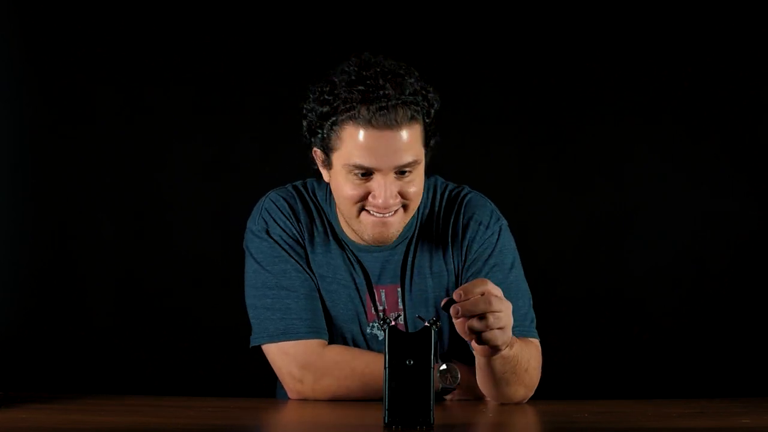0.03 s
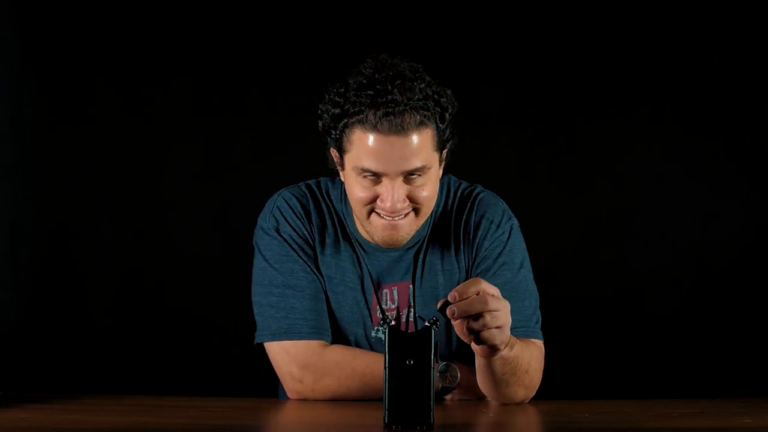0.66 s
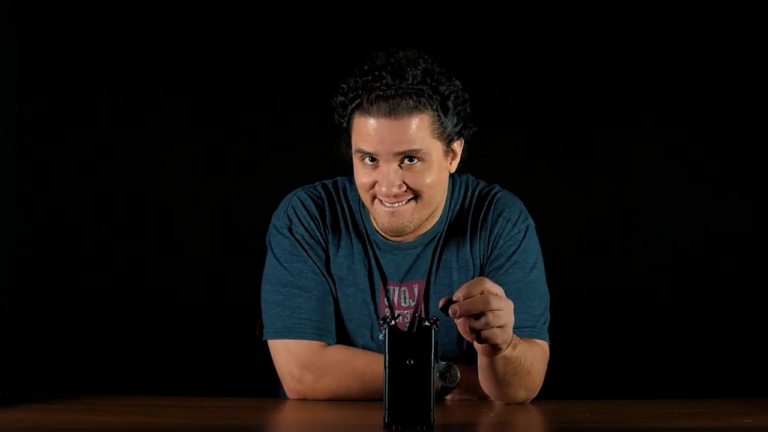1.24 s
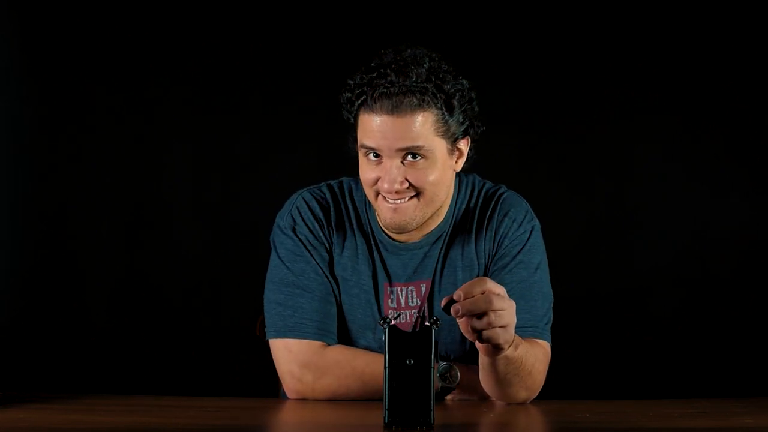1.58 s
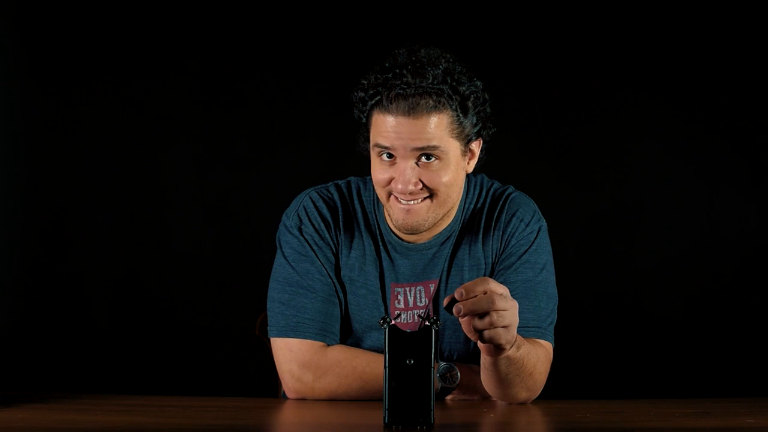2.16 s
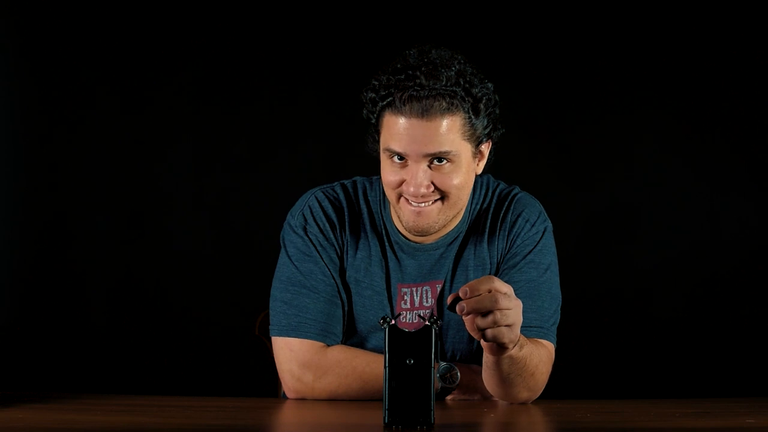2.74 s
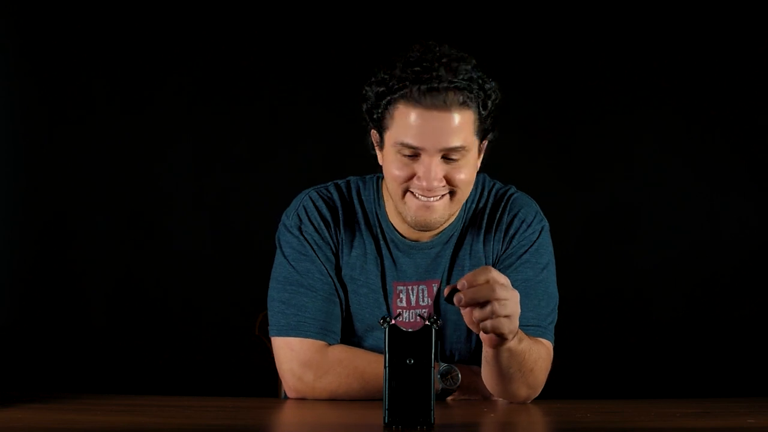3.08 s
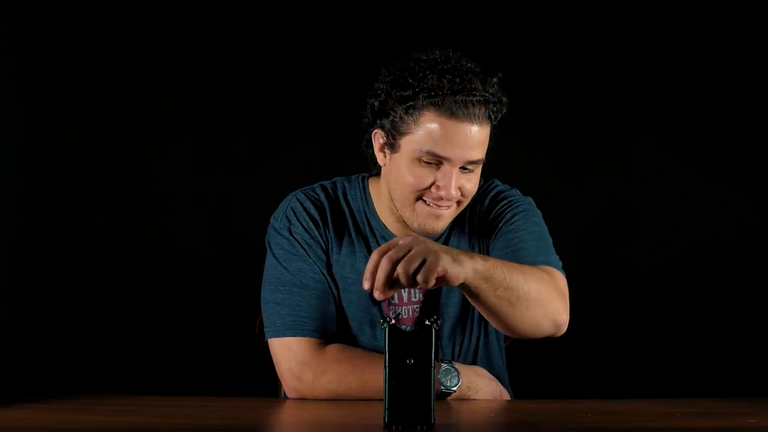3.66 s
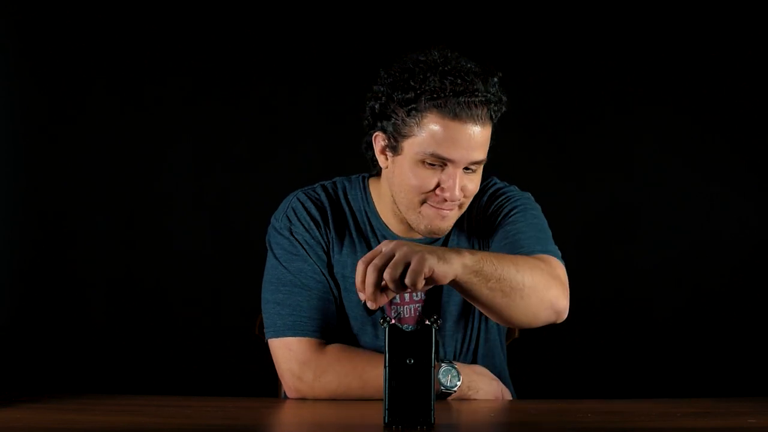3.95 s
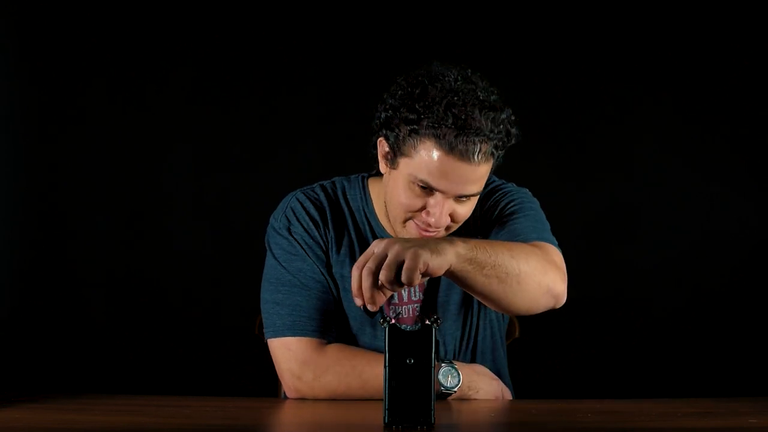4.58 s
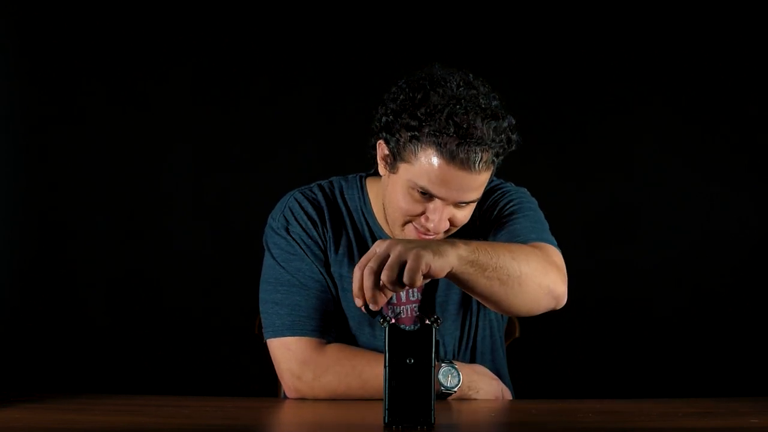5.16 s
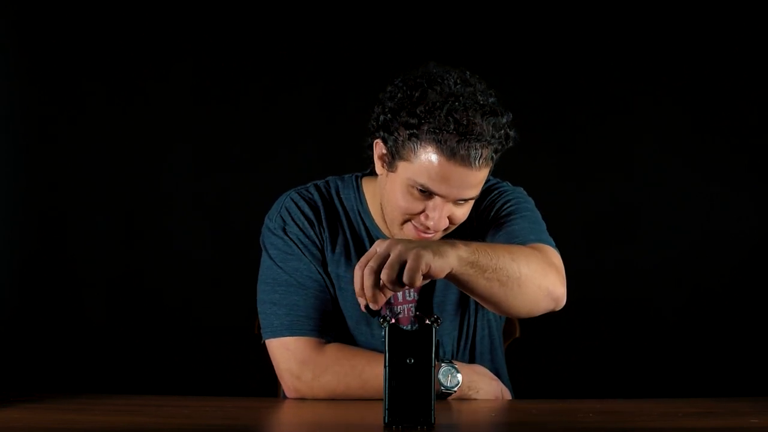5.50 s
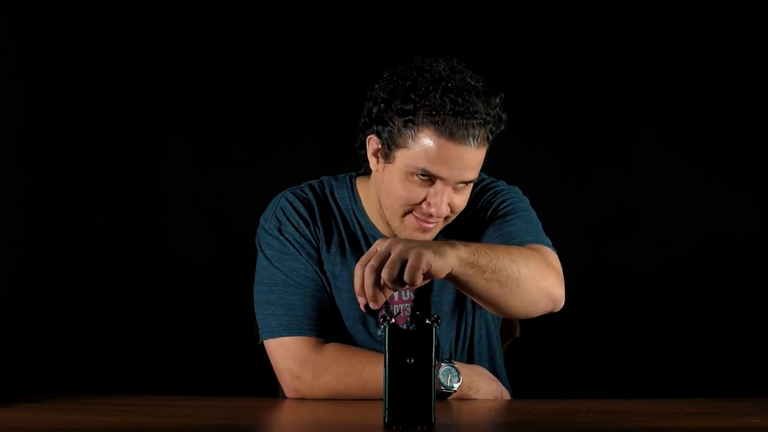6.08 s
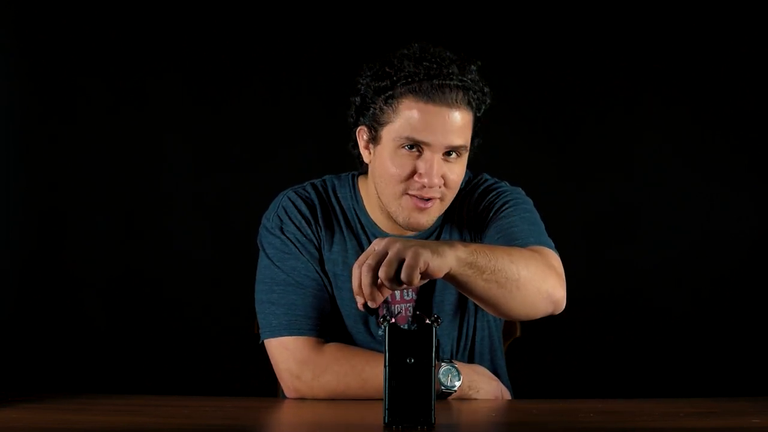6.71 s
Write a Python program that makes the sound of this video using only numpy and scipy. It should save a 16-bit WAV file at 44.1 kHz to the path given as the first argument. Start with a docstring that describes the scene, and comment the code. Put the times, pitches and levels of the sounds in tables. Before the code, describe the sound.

Very close finger scratching on microphone grilles, a low rumble with a hissy rasp, heard almost wholly on one side at a time. It starts on the right with fast light rubs, thins out around a dull bump on the recorder's body, and resumes louder on the left as a back-and-forth stroke with soft fingertip thuds. Faint wet smacks dot the otherwise quiet room.

```python
"""A quiet room: fingertips scratch the mesh over two microphone capsules, first the right in mostly
even rubs, then the left in long pulls and short flicks back. A finger lands with a soft thump, creeps,
then slides; the faster the slide, the higher the rumble and the more the mesh rasps and hisses, almost
wholly on that side. The hand bumps the housing once as it changes sides. A few small wet ticks and
smacks reach both capsules through the air."""
import sys
import numpy as np
from scipy import signal
from scipy.fft import rfft, irfft
from scipy.io import wavfile
from scipy.ndimage import uniform_filter1d

SR = 44100
rng = np.random.default_rng(int(sys.argv[2]) if len(sys.argv) > 2 else 0)


def wav_record(signal):
    """Record a signal, one row per channel, as 16-bit PCM in the file named by sys.argv[1]."""
    frames = np.transpose(np.atleast_2d(signal))
    bounded = np.clip(frames, -1, 1)
    # unit amplitude maps onto the largest positive 16-bit level
    quanta = np.round(bounded * 32767).astype(np.int16)
    wavfile.write(sys.argv[1], SR, quanta)


N = 301511

# room rumble and preamplifier hiss: f/Hz, left density/dB, right density/dB
FLOOR_SPECTRUM = [(24, -92, -104), (69, -77, -86.5), (139, -83, -78.5), (263, -88, -94.5),
                  (384, -107, -106), (560, -102, -103), (1190, -113, -114), (2200, -119, -118),
                  (3470, -123, -123), (11650, -127, -126), (13700, -139, -139)]
# finger tremor: f/Hz, relative density/dB
TREMOR_SPECTRUM = [(25, -14), (65, 13), (110, 8.5), (170, 11), (300, -14.5), (600, -9), (1200, -22.5),
                   (2500, -50)]
# tremor on each capsule: t/s, relative level/dB
RIGHT_TREMOR = [(0.0, -65.5), (0.27, -71), (0.44, -49.5), (0.89, -70), (1.2, -49), (2.02, -53.5),
                (3.4, -66)]
LEFT_TREMOR = [(3.87, -64), (4.3, -54.5), (4.75, -53), (5.1, -43.5), (5.7, -49.5), (6.3, -47.5),
               (6.84, -48.5)]
# friction on each capsule: f/Hz, relative density/dB
RIGHT_SPECTRUM = [(15, -74), (25, -54), (48, -24.5), (188, 4), (420, 1), (629, -13.5), (1020, -7),
                  (1890, -29.5), (2480, -35), (3350, -41.5), (4300, -36.5), (5200, -44.5), (6200, -41),
                  (7660, -41.5), (8760, -45), (10000, -39), (15400, -62)]
LEFT_SPECTRUM = [(15, -61), (25, -55), (60, -27.5), (129, -7), (246, 1.5), (296, -1), (409, -3),
                 (596, -22.5), (1110, -27), (1840, -49), (2750, -50.5), (3500, -51.5), (4700, -52.5),
                 (6200, -53.5), (8300, -54), (10600, -52.5), (13500, -62.5), (15400, -77)]
# capsule and grille resonances: f/Hz, width/Hz, gain/dB
CAPSULE_MODES = [(240, 28, -0.5), (403, 360, -0.5), (977, 1800, 4.5), (2450, 780, 9), (4180, 690, -2.5),
                 (7880, 2700, 6.5), (10600, 3500, 4), (13000, 2900, 5.5)]
# finger strokes: crest t/s, length/s, rumble level/dB, speed/0-1
LIGHT_RUBS = [(0.06, 0.1, -48, 0.08), (0.955, 0.06, -64, .33), (1.018, 0.19, -32.5, 0.47),
              (1.173, 0.054, -28, 0.49), (1.281, 0.11, -27, 0.75), (1.427, 0.09, -25.5, 0.59),
              (1.546, 0.1, -26, 0.76), (1.711, 0.11, -32, 0.84), (1.851, 0.1, -26.5, 0.87),
              (1.992, 0.097, -32, 0.85), (2.108, 0.1, -31, 0.86), (2.247, 0.057, -33.5, 0.89),
              (2.38, 0.11, -30, 0.88), (2.697, 0.088, -31.5, 0.9), (2.799, 0.04, -45, 0.83),
              (2.958, 0.11, -38, 0.99), (3.262, 0.1, -47.5, 0.71)]
HEAVY_PULLS = [(0.296, 0.096, -27.5, 0.22), (0.43, 0.094, -23.5, 0.63), (0.701, 0.045, -47.5, 0.51),
               (2.545, 0.095, -33, 0.29), (3.898, 0.078, -25.5, 0.73), (3.959, 0.084, -30.5, 0.55),
               (4.242, 0.096, -25, .8), (4.539, 0.11, -25.5, 0.98), (4.823, 0.1, -15.5, 0.82),
               (5.104, 0.11, -14.5, .73), (5.38, 0.1, -17, 0.79), (5.653, 0.083, -16, .78),
               (5.949, 0.13, -21, 0.6), (6.245, 0.093, -16.5, 0.65), (6.57, 0.067, -20.5, 0.54),
               (6.83, 0.074, -23, 0.44)]
BACK_FLICKS = [(0.592, 0.052, -30.5, 0.51), (3.126, 0.11, -50, 0.86), (4.115, 0.059, -27, 0.84),
               (4.393, 0.026, -28, 0.91), (4.694, 0.031, -21.5, 0.82), (4.968, 0.035, -21.5, 0.81),
               (5.252, 0.019, -19.5, 0.69), (5.526, 0.038, -25.5, 0.66), (5.801, 0.098, -27.5, 0.56),
               (6.09, 0.066, -26.5, 0.35), (6.381, 0.055, -27.5, 0.34), (6.687, 0.044, -30.5, 0.39)]
# fingertip landings: t/s, peak level before panning/dB
FINGER_LANDINGS = [(0.2712, -33), (0.4043, -35), (0.6965, -44.5), (1.3999, -31), (2.5287, -34),
                   (3.8841, -42), (4.174, -42), (4.3368, -48), (4.4625, -32.5), (4.656, -43), (4.745, -25),
                   (4.9244, -30), (5.0228, -29.5), (5.2138, -29), (5.307, -23.5), (5.4815, -29),
                   (5.5803, -36), (5.752, -26.5), (5.873, -38), (6.0602, -25.5), (6.176, -41), (6.355, -27),
                   (6.4668, -30.5), (6.7726, -28.5)]
# wet ticks and smacks: t/s, hold/s, relative level/dB, snap f/Hz, low and mid ring/dB re snap
WET_TICKS = [(2.494, 0.00049, -32, 11350, -9, -30), (3.232, 0.0066, -83.5, 10900, 30.5, -14),
             (3.275, 0.02, -62.5, 11000, -7, -32), (3.417, 0.0019, -53.5, 12100, 6, -34),
             (3.825, 0.012, -54.5, 9700, 8.5, -27), (3.9464, 0.0012, -36.5, 9400, -17, -30),
             (6.124, 0.024, -52.5, 7700, 11.5, 2.5), (6.587, 0.001, -35, 12500, -15, -23),
             (6.597, 0.00066, -31, 10700, -26, -35), (6.647, 0.0016, -32, 9000, -45, -11),
             (6.749, 0.00084, -49.5, 10000, -31, -11), (6.767, 0.0013, -51, 9800, 0, 0)]
# housing resonances: f/Hz, relative level/dB, t60/s
HOUSING_MODES = [(120, -4, 0.17), (245, -2, .1), (320, -9, .08), (490, -18, .06)]

# stroke types; pitch and treble (scrape, rasp, hiss re rumble) hold at speed 1
RUB = dict(rise_share=0.47, pitch_hz=372, treble_db=(-6, -15.5, -17))
PULL = dict(rise_share=0.33, pitch_hz=319, treble_db=(-11, -22.5, -25))
FLICK = dict(rise_share=0.44, pitch_hz=319, treble_db=(-2.5, -19.5, -23))
CREEP = dict(rise_share=0.43, pitch_hz=340, treble_db=(-8, -23, -28))
CHANGE_SIDES_S = 3.6


def from_db(db):
    return 10 ** (np.asarray(db) / 20)


def unit_rms(x):
    return x / np.sqrt(np.mean(x ** 2) + 1e-30)


def gain_at(spectrum, hz):
    """Spectrum table as gain, interpolated over log frequency."""
    table_hz, table_db = np.transpose(spectrum)
    return from_db(np.interp(np.log(hz + 1), np.log(table_hz), table_db))


def bins_hz(size):
    return np.arange(size // 2 + 1) * SR / size


def lowpass_gain(hz, edge_hz, power=4):
    return 1 / (1 + (hz / edge_hz) ** power)


def coloured_noise(spectrum):
    return irfft(rfft(rng.standard_normal(N)) * gain_at(spectrum, bins_hz(N)), N) * np.sqrt(SR / 2)


def resonate(x, hz, width_hz):
    r = np.exp(-np.pi * width_hz / SR)
    gain = (1 - r * r) / 2
    return signal.lfilter([gain, 0, -gain], [1, -2 * r * np.cos(2 * np.pi * hz / SR), r * r], x)


def pan_gains(left_over_right_db):
    pair = from_db([[left_over_right_db / 2], [-left_over_right_db / 2]])
    return pair / pair.mean()


def add(out, sound, start_s):
    start = round(start_s * SR)
    first, last = max(start, 0), min(start + sound.shape[-1], N)
    out[..., first:last] += sound[..., first - start:last - start]


def noise_floor():
    """Steady room rumble and preamplifier hiss, independent on each side."""
    return np.array([coloured_noise(np.array(FLOOR_SPECTRUM)[:, [0, side]]) for side in (1, 2)])


def tremor(curve, gain_db, wobble_db=7.5, lift_s=0.027, lift_db=-4):
    """Fingers resting on the housing tremble, less so while one lifts before landing."""
    t = np.arange(N) / SR
    lifted = sum(1.0 * ((t > land_s - lift_s) & (t < land_s)) for land_s, _ in FINGER_LANDINGS)
    dip_db = lift_db * uniform_filter1d(lifted, 300)
    pressure_db = np.interp(t, *np.transpose(curve), left=-120, right=-120)
    wobble = unit_rms(uniform_filter1d(uniform_filter1d(rng.standard_normal(N), 900), 300))
    envelope = from_db(pressure_db + gain_db + dip_db + wobble_db * wobble)
    return envelope * unit_rms(coloured_noise(TREMOR_SPECTRUM))


def friction(size, slips_per_s=450, slip_gain=0.95, grit_db=-1.0):
    """Skin ridges catch on the mesh and let go: uneven slips within a fine, gritty rub."""
    slipping = rng.random(size) < slips_per_s / SR
    slips = slipping * rng.uniform(0.31, 1, size) * rng.choice([-1, 1], size)
    grit = from_db(grit_db * unit_rms(uniform_filter1d(rng.standard_normal(size), 60)))
    return slip_gain * unit_rms(slips) + unit_rms(rng.standard_normal(size) * grit)


def grille(spectrum, hz, pitch_hz, hollow, neutral_hz=275, gap_s=0.000377, palm_s=0.001643):
    """Capsule response: the pad tunes the rumble, its echo notches the treble, the palm adds ripple."""
    modes_db = sum(db / (1 + (2 * (hz - mode_hz) / width_hz) ** 2)
                   for mode_hz, width_hz, db in CAPSULE_MODES)
    pad_reach = lowpass_gain(hz, 520)
    tuned = gain_at(spectrum, hz * (neutral_hz / pitch_hz) ** pad_reach)
    # long waves pass round the fingertip, the shortest scatter off the skin
    reflected = (1 - lowpass_gain(hz, 2200)) * lowpass_gain(hz, 8000)
    gap_echo = hollow * reflected * np.exp(-2j * np.pi * hz * gap_s * rng.uniform(0.96, 1.04))
    palm_echo = 0.36 * (1 - pad_reach) * np.exp(-2j * np.pi * hz * palm_s * rng.uniform(0.6, 1.4))
    return tuned * from_db(modes_db) * (1 + gap_echo) * (1 + palm_echo)


def scratches(strokes, spectrum, rise_share, pitch_hz, treble_db, size=16384):
    """Each stroke bites quickly, then slows; faster ones are higher, brighter and less hollow."""
    out, hz = np.zeros(N), bins_hz(size)
    t = (np.arange(size) - size // 2) / SR
    below = [lowpass_gain(hz, border_hz, power=8) for border_hz in (650, 1700, 3600)]
    bands = np.diff([0 * hz, *below, 1 + 0 * hz], axis=0)   # rumble, scrape, rasp, hiss
    band_spans = (1, 1, 0.85, 0.75)   # shares of the stroke
    treble_db_per_speed_db = np.array([0.91, 3, 3.65])
    flank_power = np.where(t < 0, 3.87, 2.43)
    flank_share = np.where(t < 0, rise_share, 1 - rise_share)
    for crest_s, length_s, rumble_db, speed in strokes:
        hollow = min(1 - speed + 0.1 * rng.random(), 1)   # finger angle varies
        rub = rfft(friction(size)) * grille(spectrum, hz, pitch_hz * speed ** 0.52, hollow)
        upper_db = np.array(treble_db) + treble_db_per_speed_db * 20 * np.log10(speed)
        from_crest = np.abs(t / (flank_share * length_s))
        for band, band_db, span in zip(bands, [0, *upper_db], band_spans):
            swell = from_db(-20 * np.minimum((from_crest / span) ** flank_power, 10))
            sound = unit_rms(irfft(rub * band, size) * swell) * np.sqrt(np.mean(swell ** 2))
            add(out, from_db(rumble_db + band_db) * sound, crest_s + t[0])
    return out


def leak(x, air_db, housing_db, edge_hz=3000):
    """The far capsule gets treble through the air and a trace of rumble through the housing."""
    treble = signal.sosfilt(signal.butter(2, edge_hz, "high", fs=SR, output="sos"), x)
    return from_db(air_db) * treble + from_db(housing_db) * x


def thumps(swing_hz=190, width_hz=300, knock_db=-24, pad_cutoff_hz=900, separation_db=43):
    """A soft pad lands and pushes the capsule, which swings back once and knocks lightly."""
    out = np.zeros((2, N))
    push = signal.sosfilt(signal.butter(6, pad_cutoff_hz, fs=SR, output="sos"), signal.unit_impulse(2048))
    knock = from_db(knock_db) * resonate(push, hz=900, width_hz=450)
    for land_s, peak_db in FINGER_LANDINGS:
        firmness = rng.uniform(0.9, 1.1)
        swing = resonate(resonate(push, swing_hz * firmness, width_hz), swing_hz, width_hz)
        thump = swing + knock
        pan = pan_gains(separation_db * np.sign(land_s - CHANGE_SIDES_S))
        add(out, from_db(peak_db) * pan * thump / np.abs(thump).max(), land_s)
    return out


def creeps(strokes, spectrum, gain_db, speed=0.46, max_wait_s=0.115, stretch=1.58, lag_s=0.009):
    """A finger that has just landed creeps over the mesh until its stroke breaks loose."""
    slow_strokes = []
    for crest_s, _, rumble_db, _ in strokes:
        wait_s = crest_s - max(land_s for land_s, _ in FINGER_LANDINGS if land_s < crest_s)
        if wait_s < max_wait_s:
            slow_strokes.append((crest_s - wait_s / 2 + lag_s, stretch * wait_s, rumble_db + gain_db, speed))
    return scratches(slow_strokes, spectrum, **CREEP)


def fingers(spectrum, start_s, end_s):
    """All strokes and creeps on one capsule while the hand is over it."""
    rubs, pulls, flicks = [[row for row in table if start_s < row[0] < end_s]
                           for table in (LIGHT_RUBS, HEAVY_PULLS, BACK_FLICKS)]
    slides = sum(scratches(strokes, spectrum, **kind)
                 for strokes, kind in ((rubs, RUB), (pulls, PULL), (flicks, FLICK)))
    return slides + creeps(pulls, spectrum, gain_db=-13.5) + creeps(flicks, spectrum, gain_db=-11)


def wet_ticks(gain_db=-6, pan_db=-3.5, widen_hz_per_s=45000, room_t60_s=0.16, size=8192):
    """A bright snap, two lower rings and a short room wash; longer smacks are broader and fade slower."""
    out, t = np.zeros((2, N)), np.arange(size) / SR
    for start_s, hold_s, level_db, snap_hz, low_db, mid_db in WET_TICKS:
        rings = [(snap_hz, 3600, 0, -18),
                 (1850, 1100 + widen_hz_per_s * hold_s, low_db, -12),
                 (5000, 900, mid_db, -12)]
        attack = np.minimum(2 * t / hold_s, 1)
        fading_s = np.maximum(t - hold_s, 0)
        t60_s = 0.0058 + 4.9 * hold_s
        for centre_hz, width_hz, ring_db, room_db in rings:
            decay = from_db(-60 * fading_s / t60_s) + from_db(room_db - 60 * fading_s / room_t60_s)
            edges_hz = [centre_hz - width_hz / 2, centre_hz + width_hz / 2]
            band = signal.butter(3, edges_hz, "band", fs=SR, output="sos")
            burst = attack * decay * rng.standard_normal((2, size))
            ring = signal.sosfilt(band, burst) * np.sqrt(SR / 2 / width_hz)
            add(out, from_db(level_db + gain_db + ring_db) * pan_gains(pan_db) * ring, start_s)
    return out


def housing_bump(start_s=3.2635, gain_db=-23.5, contact_s=0.0018):
    """Bumped by the hand, the housing rings and rocks both capsules a quarter cycle apart."""
    out, t = np.zeros((2, N)), np.arange(16384) / SR
    phase_rad = np.array([[np.pi], [np.pi / 2]])
    ring = sum(from_db(db - 60 * t / t60_s) * np.sin(2 * np.pi * hz * t + phase_rad)
               for hz, db, t60_s in HOUSING_MODES)
    soft_contact = 1 - np.exp(-np.square(t / contact_s))
    add(out, from_db(gain_db) * soft_contact * ring, start_s)
    return out


def scene():
    """Each capsule carries its own scratches; bump, ticks and room reach both."""
    right = fingers(RIGHT_SPECTRUM, 0, CHANGE_SIDES_S) + tremor(RIGHT_TREMOR, gain_db=1.5)
    left = fingers(LEFT_SPECTRUM, CHANGE_SIDES_S, np.inf) + tremor(LEFT_TREMOR, gain_db=5)
    capsules = np.array([left + leak(right, air_db=-62, housing_db=-48),
                         right + leak(left, air_db=-23, housing_db=-56)])
    return capsules + noise_floor() + thumps() + wet_ticks() + housing_bump()


def record(dry):
    """Steep low-pass on the top treble."""
    cutoff_hz = 15700
    return signal.sosfilt(signal.ellip(10, 0.2, 80, cutoff_hz, fs=SR, output="sos"), dry)


dry = scene()
out = record(dry)
wav_record(out)
```